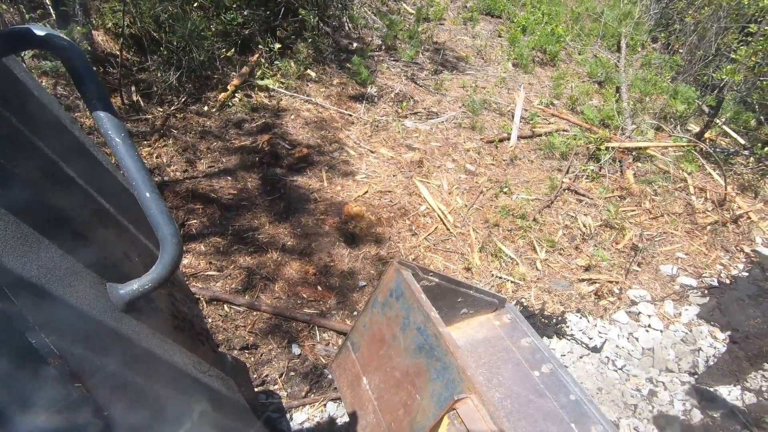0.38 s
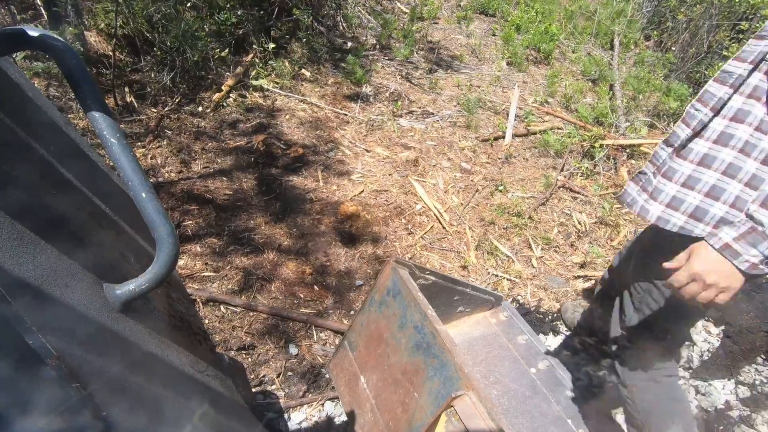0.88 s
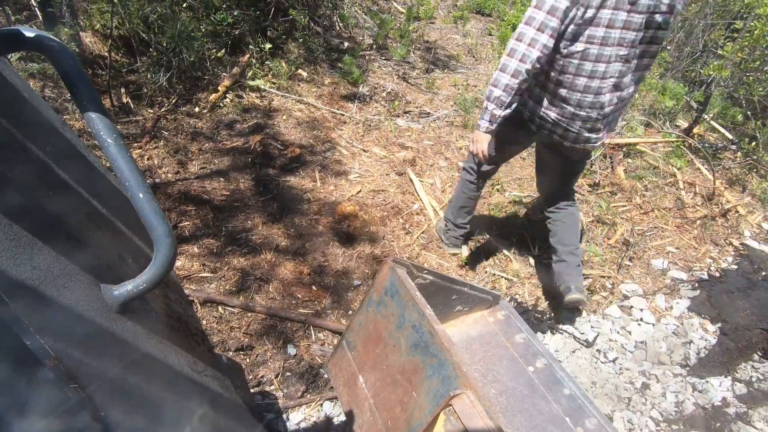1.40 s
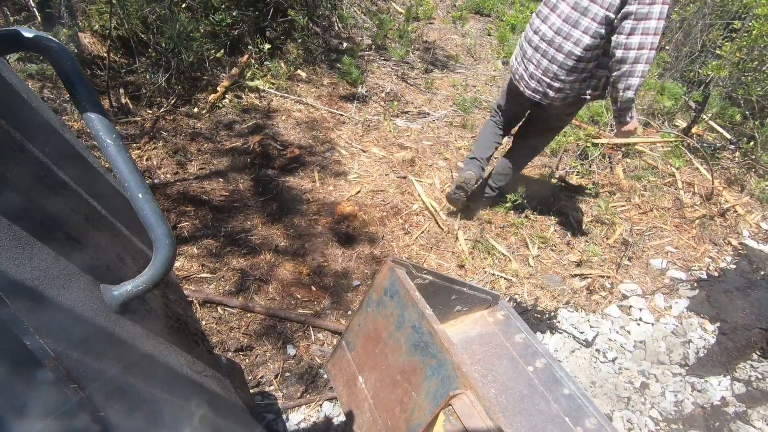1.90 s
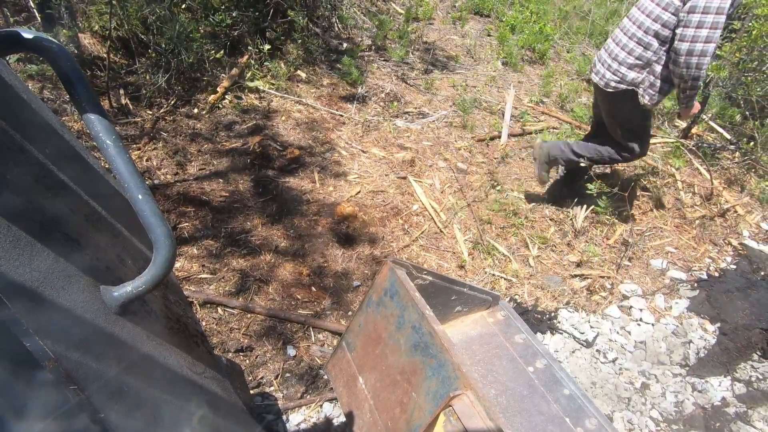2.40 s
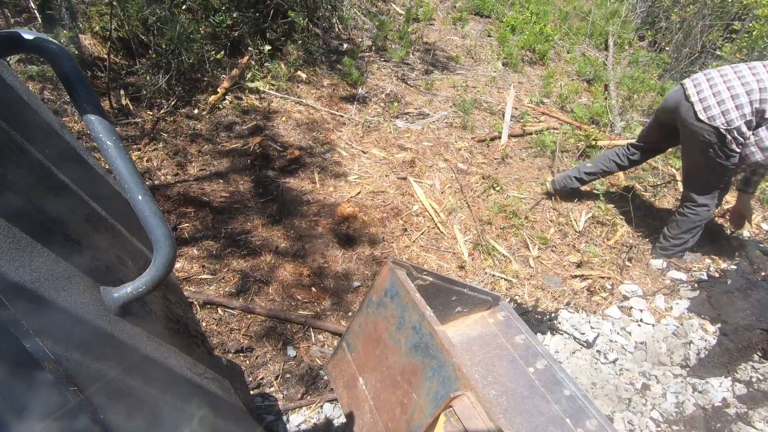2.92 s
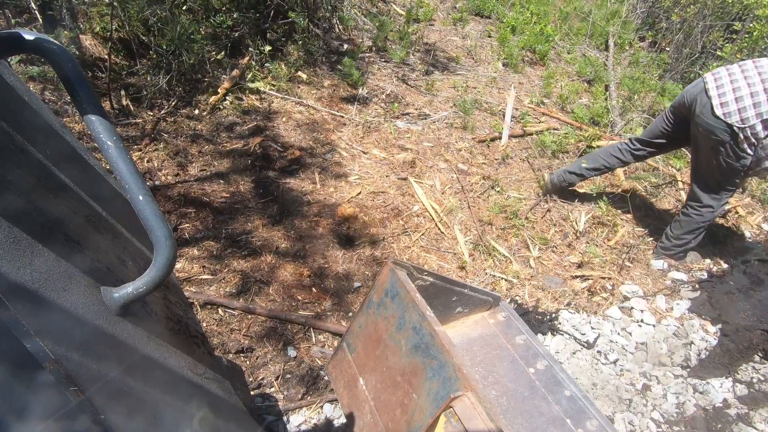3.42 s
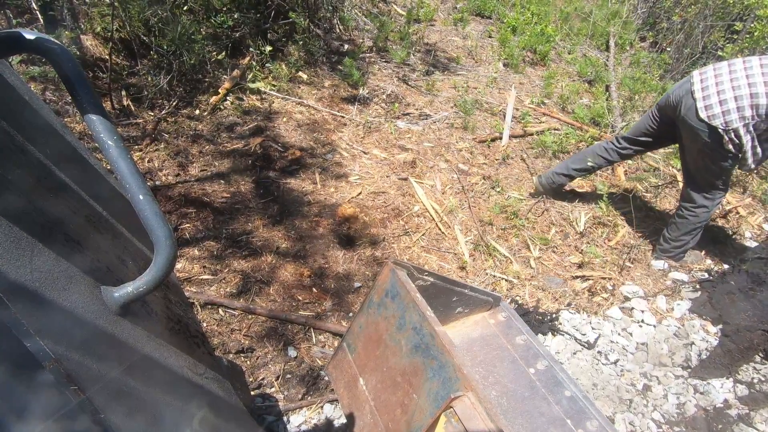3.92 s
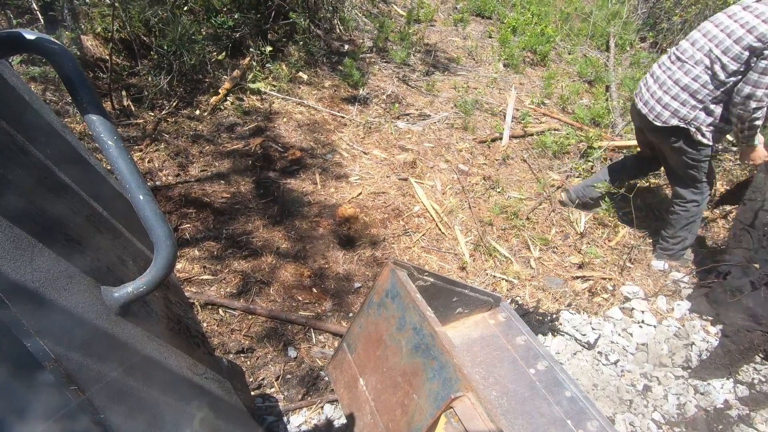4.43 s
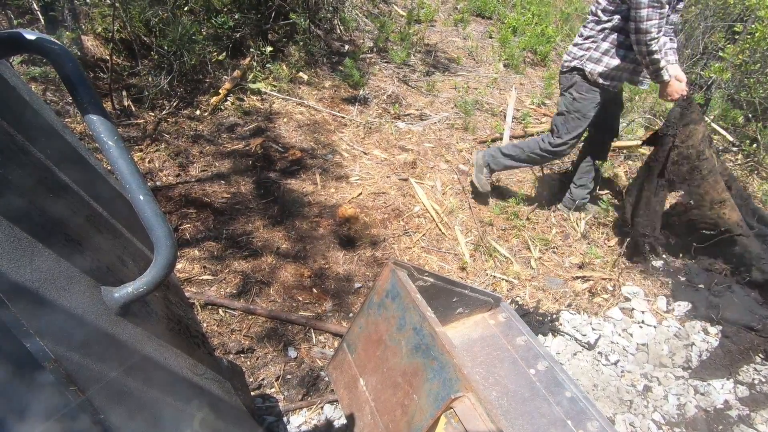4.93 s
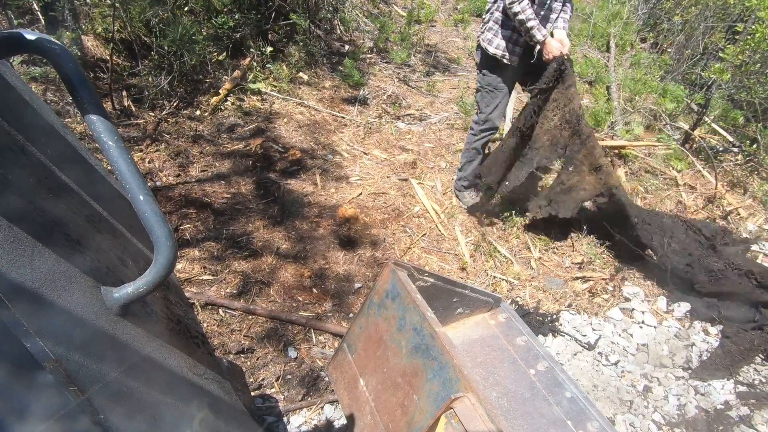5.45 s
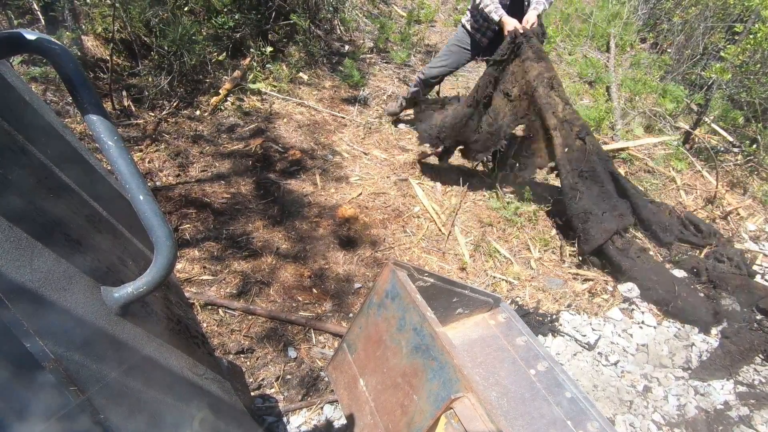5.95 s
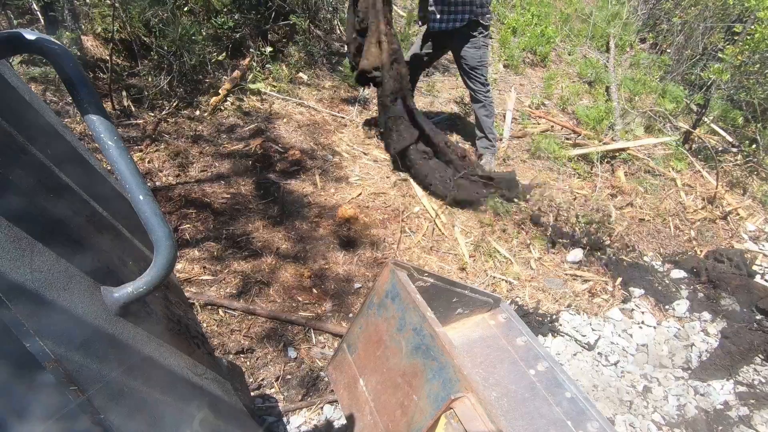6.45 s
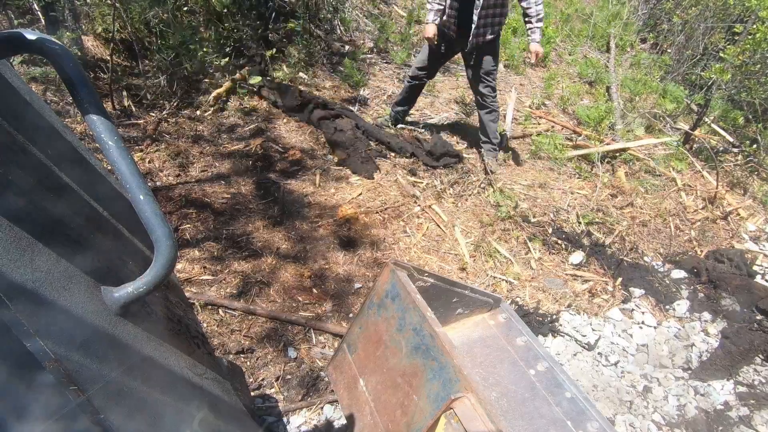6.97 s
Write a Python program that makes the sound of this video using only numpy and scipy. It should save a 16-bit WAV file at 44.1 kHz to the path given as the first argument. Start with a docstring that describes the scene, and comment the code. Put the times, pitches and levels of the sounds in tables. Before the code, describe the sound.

A small diesel loader engine drones steadily outdoors, low and throbbing with valve clatter and faint pump whine, as a steel latch clanks early on.

```python
"""Outdoors, on the cab of a small diesel loader: one microphone hears the engine running at a steady speed.
Exhaust beats and the gear pump's whine are wavering multiples of the shaft speed.
Valve clatter and fan roar are shaped noise; a steel latch clanks early on as noise bursts and decaying sines.
Playback is time-stretched: the drone's phase skips now and then, and between skips
phase offsets in narrow bands slide left and right apart."""
import sys
import numpy as np
from scipy import signal
from scipy.fft import rfft, irfft
from scipy.io import wavfile
from scipy.ndimage import uniform_filter1d

SR = 44100
rng = np.random.default_rng(int(sys.argv[2]) if len(sys.argv) > 2 else 0)


def wrap_up_sound(samples):
    """Save the sound to the file named by the first command line argument, as 16-bit audio."""
    columns = np.atleast_2d(samples).T
    # keep every value between -1 and 1, then stretch to whole-number steps
    tamed = np.clip(columns, -1, 1)
    steps = np.round(tamed * 32767).astype(np.int16)
    wavfile.write(sys.argv[1], SR, steps)


def attenuation_scalar(level_db):
    """Turn a level in dB into a linear amplitude multiplier (20 dB per decade)."""
    decades = np.asarray(level_db, float) / 20
    return 10 ** decades


N = 312649
SHAFT_HZ = 37.07


def evened(x):
    """Scales a signal to rms 1."""
    return x / np.sqrt(np.mean(abs(x) ** 2) + 1e-20)


def read(points, hz):
    """Reads a spectrum table in dB along a log-frequency axis."""
    f, value = np.transpose(points)
    return np.interp(np.log(hz + 1), np.log(f + 1), value)


# Skips, where both ears snap back in step; a zero jump leaves the drone unbroken: start_s, jump_turns (of the shaft)
PLAYBACK_SKIPS = [(.415, 0), (.485, 0), (1.045, .187), (1.353, .295), (1.674, .39), (1.814, 0),
                  (2.758, .048), (3.24, -.411), (3.69, .348), (3.968, 0), (4.102, .051), (4.362, -.043),
                  (4.598, -.274), (4.96, -.305), (5.718, -.345)]


def tone(order, db, waver, waver_hz, lag_rad=0.):
    """A wavering multiple of the shaft speed; each skip cross-fades it to another point of the turn."""
    start_turn, fade_s, step = .27, 0.021, 64
    coarse = np.arange(0, N + step, step)
    skip_s, jump = np.transpose(PLAYBACK_SKIPS)
    knots = np.ravel([skip_s - fade_s / 2, skip_s + fade_s / 2], "F")
    after = np.cumsum(jump)
    turns = start_turn + np.ravel([after - jump, after], "F")
    skipping = np.interp(coarse / SR, knots, np.exp(2j * np.pi * order * turns))

    # slow complex noise wavers both level and phase
    a, b = rng.standard_normal((2, len(coarse)))
    pole = np.exp(-2 * np.pi * waver_hz * step / SR)
    slow = evened(signal.lfilter([1], [1, -pole], a + 1j * b))
    shape = np.interp(np.arange(N), coarse, skipping * (1 + waver * slow))

    angle = 2 * np.pi * order * SHAFT_HZ * np.arange(N) / SR + lag_rad
    return np.sqrt(2) * attenuation_scalar(db) * (shape.real * np.cos(angle) - shape.imag * np.sin(angle))


# Brief dips; "shake" is shaft order 1, "firing" order 4, "pump" order 20: tone_name, centre_s, dip_db, width_s
TONE_DIPS = [("shake", 0, -14.5, 0.18), ("shake", .34, -15, .16), ("shake", .5, -5, 0.087),
             ("shake", 3.4, -2.5, .8), ("firing", .31, -2.5, 0.37), ("firing", 1.03, -2.2, 0.56),
             ("firing", 1.745, -2.7, .25), ("firing", 6.05, -2.5, .7), ("pump", 0, -15.5, 0.073),
             ("pump", 1.224, -19, 0.087), ("pump", 2.61, -4.5, 0.081), ("pump", 3.2, -10, 0.05),
             ("pump", 3.38, -3.5, 0.16), ("pump", 3.55, -5, 0.14), ("pump", 3.9, -4, 0.2),
             ("pump", 4.27, -25, .08), ("pump", 4.56, -9, 0.091), ("pump", 4.5, -4, .3),
             ("pump", 5.79, -7, 0.073), ("pump", 5.96, -9, 0.094), ("pump", 6.1, -6, .1)]


def dipped(db, name):
    """A level in dB, lowered by the smooth bell-shaped dips of one tone."""
    t = np.arange(N) / SR
    for tone_name, centre, dip_db, width in TONE_DIPS:
        if tone_name == name:
            db = db + dip_db * np.exp(-(2 * (t - centre) / width) ** 2)
    return db


# Ten gear teeth pass per turn; their tone swells and sinks: time_s, level_db
PUMP_SWELL = [(0, -40), (.25, -48.5), (.55, -40.5), (1.3, -43), (1.7, -50), (2.2, -46), (2.7, -45),
              (3.15, -52.5), (3.65, -48), (3.92, -43), (4.5, -48.5), (5.15, -50), (5.4, -43.5), (5.75, -49),
              (6.25, -48), (6.55, -40.5), (6.8, -47.5), (7.09, -46)]
# Fainter tones of the turning machinery: order (multiple of the shaft speed)
FAINT_ORDERS = [1.52, 3.4, 4.59, 5, 6, 7, 8, 9, 9.5, 11, 12, 13.5, 14, 14.5, 15, 15.5, 16, 18, 20.6, 22,
                22.5, 25, 25.5, 30, 31, 32, 33, 35, 40, 44.5, 46, 49, 54, 110, 180, 190, 200, 210, 220, 230,
                260]
# The steady level of each fainter tone, in the same sequence: level_db
FAINT_LEVELS = [-45, -47.5, -43.5, -48, -53.5, -71, -69.5, -57.5, -57, -59.5, -67.5, -63.5, -62.5, -68, -62,
                -69, -65.5, -62, -53, -53, -62, -64, -60, -64.5, -64.5, -68, -68, -60, -60, -66.5, -69.5,
                -63.5, -77.5, -81, -73.5, -79, -80, -94, -91, -99, -102]


def drone():
    """Shaft multiples; a shared lag on orders 2 and 4 makes each exhaust beat fall fast and climb slowly."""
    t = np.arange(N) / SR
    beat_lag = 2.28  # rad
    # once a turn the frame shakes, slowly growing in dB per second
    shake = tone(1, dipped(-29.5 + 0.49 * t, "shake"), waver=.06, waver_hz=4, lag_rad=.48)
    # two firings a turn, slowly sagging, with their octave
    exhaust = tone(2, -19 - 0.16 * t, waver=0.071, waver_hz=4.4, lag_rad=beat_lag)
    exhaust += tone(4, dipped(-25.5, "firing"), waver=0.014, waver_hz=2.3, lag_rad=beat_lag)
    pump = tone(10, np.interp(t, *np.transpose(PUMP_SWELL)), waver=0.32, waver_hz=9.4)
    pump += tone(20, dipped(-40, "pump"), waver=0.067, waver_hz=11)
    # the faint tones beat roughly in step
    faint = np.zeros(N)
    for order, db in zip(FAINT_ORDERS, FAINT_LEVELS):
        lag = 1.17 * rng.standard_normal()
        faint += tone(order, db, waver=0.5, waver_hz=3 + 0.03 * order, lag_rad=lag)
    return shake + exhaust + pump + faint


# Spectrum of clatter and fan roar, before overall levelling: frequency_hz, relative_density_db (per Hz)
ROAR_SPECTRUM = [(25, -52.5), (110, -50), (190, -51), (280, -71.5), (470, -73.5), (880, -71), (1420, -76),
                 (2200, -84.5), (3000, -94), (4600, -89), (5500, -88.5), (6600, -88.5), (7500, -99),
                 (9500, -110), (11300, -124), (12000, -108), (14200, -111), (15200, -121)]
# Engine-bay panels that the roar rings; negative lifts are notches: centre_hz, width_hz, lift_db
ENGINE_PANELS = [(354, 85, 5.5), (580, 120, 6), (740, 118, 14.5), (1025, 40, 6.5), (1104, 61, 2.5),
                 (1297, 58, 6), (1700, 360, 10), (4520, 570, 6), (7060, 140, 11.5), (605, 28, -4),
                 (7160, 85, -8)]


def roar():
    """Noise in thin lasting streaks and wider patches, throbbing with each firing below the treble."""
    level_db, size, hop = -37, 2048, 512
    frames, hz = N // hop + 5, np.fft.rfftfreq(size, 1 / SR)
    a, b, streaks, patches = rng.standard_normal((frames, len(hz), 4)).T
    # after the transpose, axis 0 is frequency and axis 1 is time
    streaks = evened(uniform_filter1d(uniform_filter1d(streaks, size=2, axis=0), size=8, axis=1))
    patches = evened(uniform_filter1d(uniform_filter1d(patches, size=20, axis=0), size=4, axis=1))

    colour = read(ROAR_SPECTRUM, hz)
    for centre, width, lift_db in ENGINE_PANELS:
        colour += lift_db / (1 + (2 * (hz - centre) / width) ** 2)
    z = (a + 1j * b) * attenuation_scalar(colour[:, None] + 1.4 * streaks + 0.31 * patches)
    noise = evened(signal.istft(z, nperseg=size, noverlap=size - hop)[1][:N])

    body = signal.lfilter(*signal.butter(2, 2500, fs=SR), noise)
    firing = np.cos(2 * np.pi * 2 * SHAFT_HZ * np.arange(N) / SR)
    return attenuation_scalar(level_db) * (noise + 0.064 * body * firing)


# The clearest low bands where the ears fall out of step; a skip may end one sooner:
# start_s, start_centre_hz, longest_s, ear_phase_rad
CLEAR_SLIPS = [(.05, 1860, .38, 1.5), (.043, 1350, .2, 0.8), (.755, 1700, .3, -1.2),
               (1.104, 1965, .26, -1.7), (1.11, 1380, .24, 0.5), (1.934, 1386, .23, -1.1),
               (2.266, 1526, .57, 1.2), (2.64, 1060, .12, -2), (2.85, 1870, .39, -1),
               (3.406, 1680, .3, 1.5), (3.728, 757, .22, .3), (4.623, 1930, .35, 2.3),
               (5.148, 1530, .6, 1.6), (5.148, 1330, .6, 0.9), (5.361, 1920, .4, 2), (5.792, 1060, .3, 0.8),
               (6.05, 1365, 1.1, -1.5), (6.09, 1810, .9, 1.6), (6.197, 920, .9, -0.5), (6.62, 775, .25, -2),
               (6.604, 2060, .5, -2), (6.69, 1800, .37, 1.5)]


def slips():
    """Phase slips between the ears: the listed ones, a few chance ones low down, many narrow ones in the treble."""
    # columns: start_s, start_centre_hz, width_hz, lasts_s, ear_phase_rad
    s, height, wide, lasts, angle = rng.random((6000, 5)).T
    treble = np.c_[s * (N / SR + 1) - 1, 2050 + 13500 * height ** .8, 25 + 70 * wide,
                   .1 + .5 * lasts, 2 * np.pi * (angle - .5)]
    s, height, lasts, angle = rng.random((24, 4)).T
    low = np.c_[s * N / SR, 600 + 1450 * height ** .6, np.full(24, 80),
                .08 + .15 * lasts, 1.5 * (angle - .5)]
    clear = np.insert(CLEAR_SLIPS, 2, 150, axis=1)  # each 150 Hz wide
    return np.r_[treble, low, clear]


def stretched(x):
    """Bands of phase offset between the ears creep down in pitch until they end or a skip wipes them."""
    slide_hz_per_s, wipe_top_hz = 480, 9500
    hz, t, z = signal.stft(x, SR, nperseg=2048, noverlap=1536, boundary="even")
    bin_hz = hz[1]
    creep = np.round(t * slide_hz_per_s / bin_hz).astype(int)
    offset = np.zeros((len(hz) + creep[-1] + 1, len(t)))
    wipes = np.r_[np.transpose(PLAYBACK_SKIPS)[0], 99]

    # draw each band level on a map that slides, then read the map ever higher up
    for s, centre, width, lasts, angle in slips():
        if centre > wipe_top_hz:  # no skip wipes these, and they last twice as long
            end = s + 2 * lasts
        else:
            end = min(s + lasts, wipes[wipes > s][0])
        lowest = (centre - width / 2 + s * slide_hz_per_s) / bin_hz
        bottom, top = max(int(lowest), 0), max(int(lowest + width / bin_hz) + 1, 0)
        offset[bottom:top, np.searchsorted(t, s):np.searchsorted(t, end)] = angle
    offset = np.take_along_axis(offset, np.arange(len(hz))[:, None] + creep, axis=0)

    z *= np.exp(1j * np.array([offset, -offset]) / 2)  # half the angle to each ear
    return signal.istft(z, SR, nperseg=2048, noverlap=1536)[1][:, :N]


def burst(points, size, tilt_db=0.):
    """Noise of rms 1 with the given spectrum, tilted in dB per octave above 6 kHz."""
    hz = np.fft.rfftfreq(size, 1 / SR)
    colour = read(points, hz) + tilt_db * np.log2(np.maximum(hz / 6000, 1))
    return evened(irfft(rfft(rng.standard_normal(size)) * attenuation_scalar(colour), size))


# Latch blows: start_s, strike_db (gain of rattle and ring), rise_s, knock_db (gain),
# tilt_db_per_octave (of the rattle above 6 kHz)
LATCH_BLOWS = [(.419, -48, 0.012, -37, -14), (0.442, -45.5, .006, -34, -14),
               (0.488, -42, 0.01, -38.5, -4.5)]
# Spectrum of the smeared steel rattle, levelled in burst(): frequency_hz, relative_density_db (per Hz)
RATTLE_SPECTRUM = [(900, -5), (1500, 1.5), (2000, -3), (2600, -13.5), (3400, -17), (4500, -9),
                   (6000, -12.5), (8000, -18), (9500, -30), (12000, -31), (15500, -44)]
# Ringing modes of the latch, before the blow's gain: pitch_hz, relative_db, t60_s
LATCH_MODES = [(1430, -2, 0.11), (1750, 3, 0.19), (2480, -6, 0.094), (4440, -12, .1), (5000, -23, .15),
               (6110, -11, 0.13), (11800, -41, .06)]
# Spectrum of the knock through the cab, levelled in burst(): frequency_hz, relative_density_db (per Hz)
KNOCK_SPECTRUM = [(120, -19.5), (220, -4), (300, -8), (500, -5), (900, -10.5), (1500, -16), (3000, -53)]


def clank():
    """Each latch blow: a smeared rattle, the latch's decaying modes and a rough knock through the cab."""
    out, t = np.zeros(N), np.arange(SR // 4) / SR
    for s, strike_db, rise, knock_db, tilt_db in LATCH_BLOWS:
        fall = attenuation_scalar(-60 * np.maximum(t - rise, 0) / .14)  # t60 of 0.14 s once risen
        ring = np.zeros(len(t))
        for hz, db, t60 in LATCH_MODES:
            ring += attenuation_scalar(db - 60 * t / t60) * np.sin(2 * np.pi * (hz * t + rng.random()))
        boom = attenuation_scalar(6.5 - 60 * t / 0.19) * np.sin(2 * np.pi * 222 * t)
        knock = attenuation_scalar(knock_db) * (burst(KNOCK_SPECTRUM, len(t)) * fall + boom)
        rattle = burst(RATTLE_SPECTRUM, len(t), tilt_db) * fall
        blow = attenuation_scalar(strike_db) * (rattle + attenuation_scalar(-3) * ring) + knock
        out[round(s * SR):][:len(t)] += np.minimum(t / rise, 1) * blow
    return out


def scene():
    """Drone, roar and clank sum at one microphone, giving both ears the same signal."""
    mono = drone() + roar() + clank()
    return np.array([mono, mono])


def low_pass(x):
    """Removes everything above the highest recorded frequency."""
    return signal.sosfilt(signal.butter(12, 15140, fs=SR, output="sos"), x)


def record(dry):
    """Slides the ears apart as time-stretched playback does and finishes the mix."""
    mix = stretched(dry)
    return low_pass(mix)


dry = scene()
out = record(dry)
wrap_up_sound(out)
```